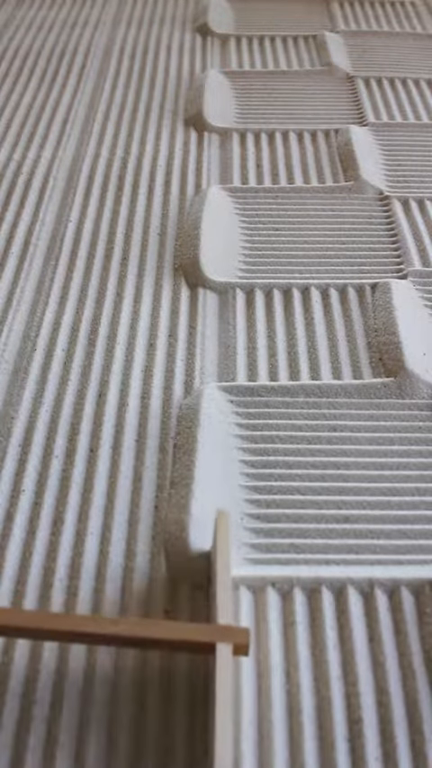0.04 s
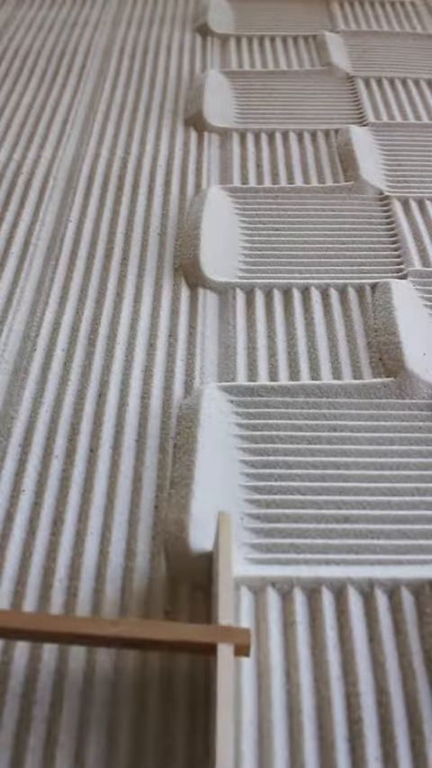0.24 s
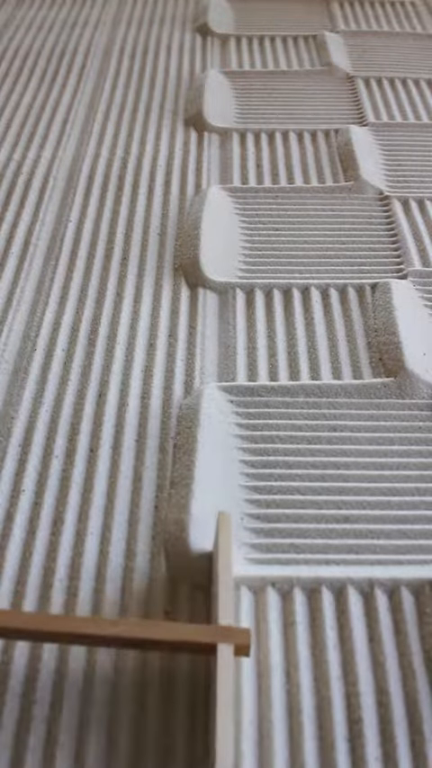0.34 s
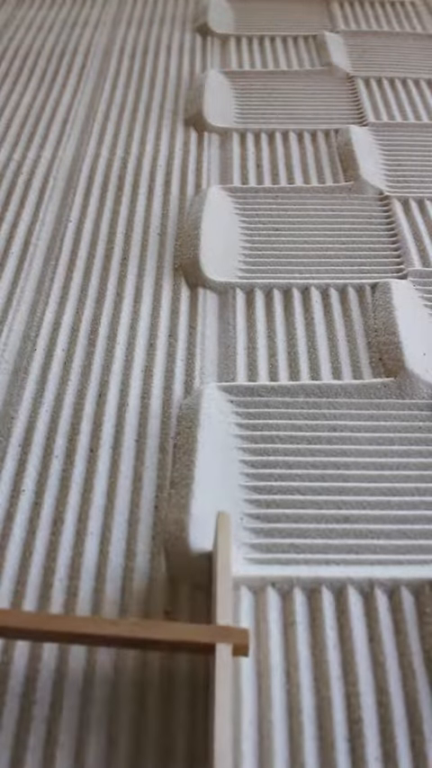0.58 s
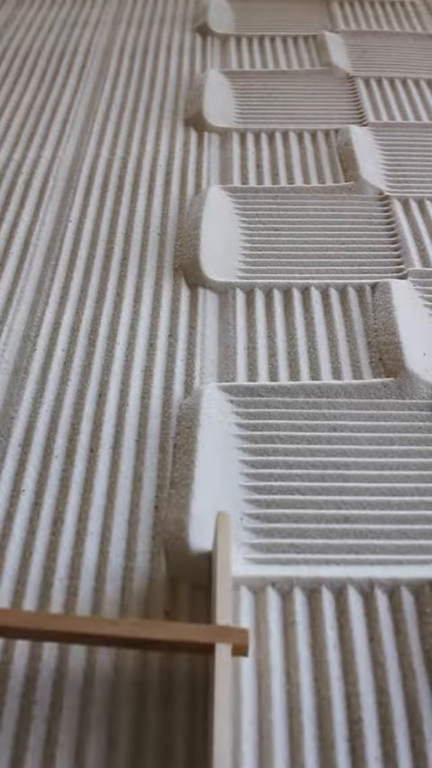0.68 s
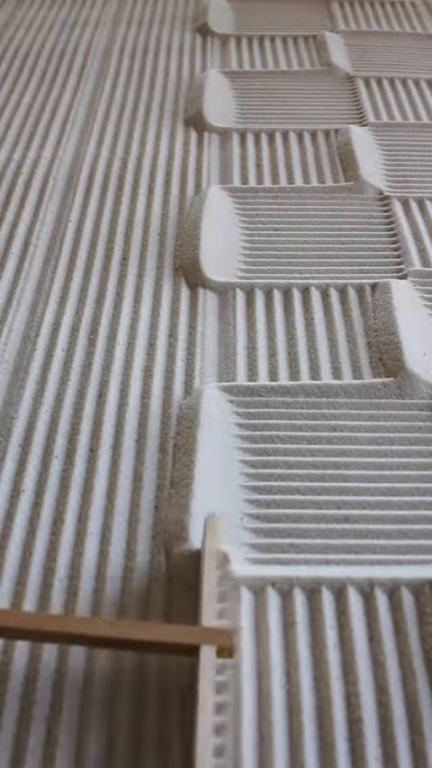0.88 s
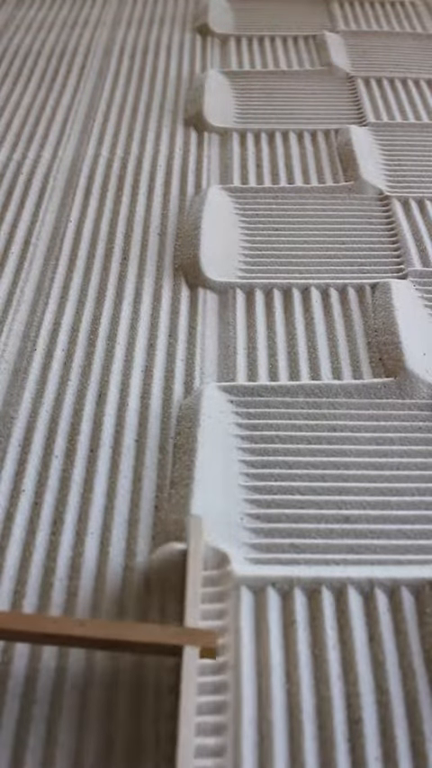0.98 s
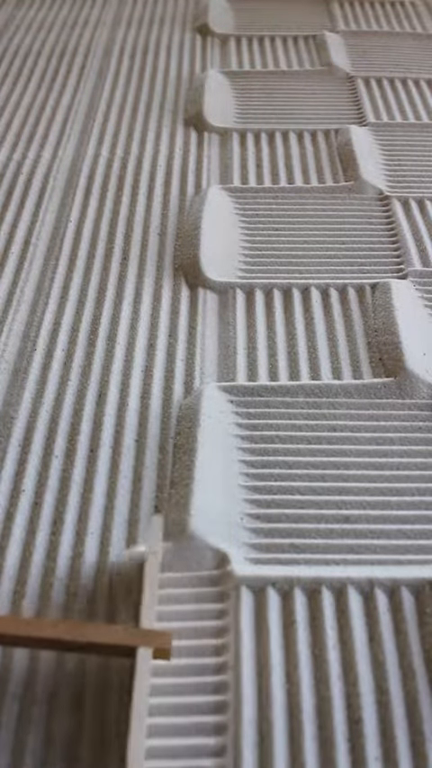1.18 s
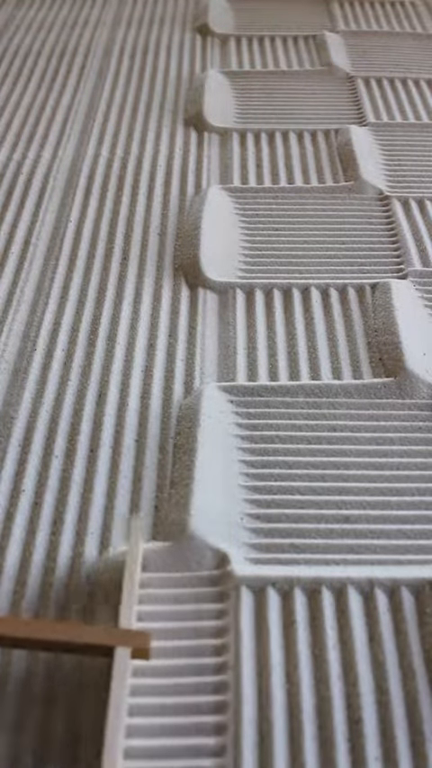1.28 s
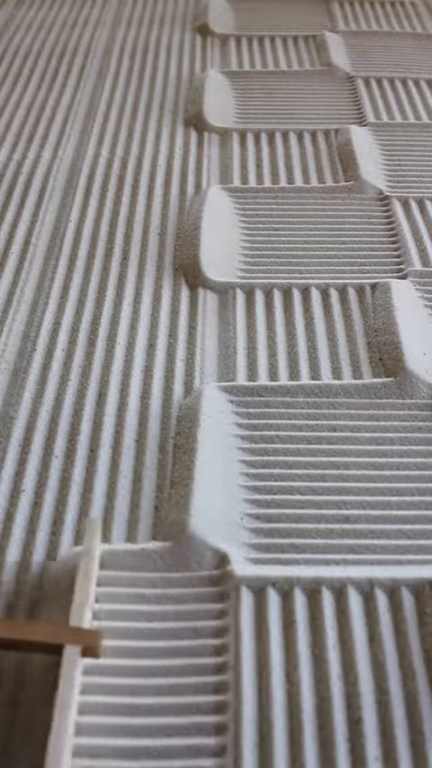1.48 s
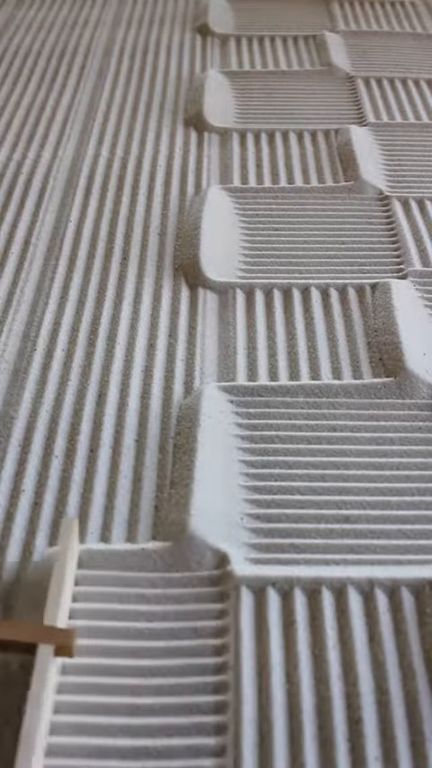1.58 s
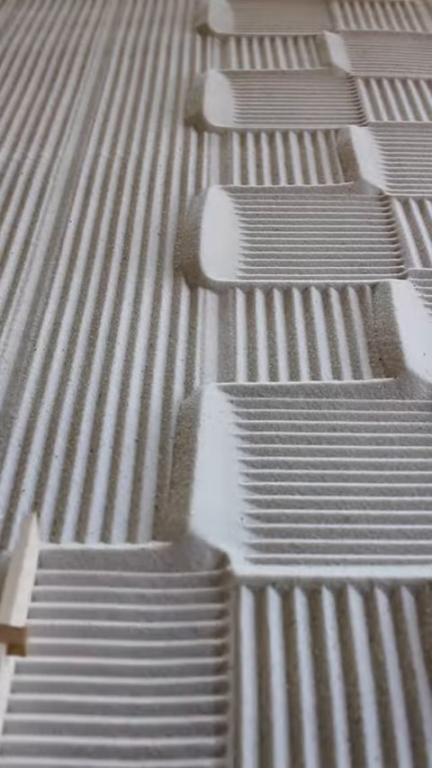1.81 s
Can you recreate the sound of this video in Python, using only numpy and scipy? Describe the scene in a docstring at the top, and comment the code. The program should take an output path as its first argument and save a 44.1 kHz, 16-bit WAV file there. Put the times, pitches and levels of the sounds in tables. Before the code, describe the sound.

A wooden rake scrapes through fine sand with a grainy hiss and small crunches.

```python
"""A wooden rake is drawn sideways through fine sand, close to the microphone, in a quiet room.
Ventilation hums throughout. First a light brush of sand, and a gust buffets the microphone.
After a pause, crisp ticks as the teeth touch down (0.7 s). Then one long grainy pull over swaying air:
short crunches, fine sand spills, the sound widens, and the rake's board drones, then briefly sings."""
import sys
import numpy as np
from scipy import signal
from scipy.fft import rfft, irfft
from scipy.io import wavfile
from scipy.ndimage import uniform_filter1d

SR = 44100
rng = np.random.default_rng(int(sys.argv[2]) if len(sys.argv) > 2 else 0)


def master(y):
    """Save y as 16-bit WAV."""
    cut = np.clip(np.atleast_2d(y).T, -1, 1)
    pcm = np.round(cut * 32767)  # scale
    wavfile.write(sys.argv[1], SR, pcm.astype(np.int16))


N = 81585
T = np.arange(N) / SR
HZ = np.fft.rfftfreq(N, 1 / SR)

# sand grains against the teeth: f/Hz, relative level/dB
SAND_SPECTRUM = [(300, -15), (900, -23), (1800, -11), (2800, -1.5), (4200, -0.5), (6500, -1), (8200, 0.4),
                 (9800, -5), (11000, -2.5), (13000, -7)]


def amp(db):
    """Decibels to gain."""
    return 10 ** (np.asarray(db) / 20)


def unit(x):
    """Scales to rms 1."""
    return x / np.sqrt(np.mean(x ** 2) + 1e-20)


def over_hz(points):
    """Interpolates a table over log frequency."""
    hz, value = np.transpose(points)
    return np.interp(np.log(HZ + 1), np.log(hz + 1), value)


def envelope(points):
    """Gain from a dB curve, falling 400 dB/s beyond its ends."""
    t_s, db = np.transpose(points)
    outside_s = np.maximum(t_s[0] - T, 0) + np.maximum(T - t_s[-1], 0)
    return amp(np.interp(T, t_s, db) - 400 * outside_s)


def colour(x, spectrum):
    """Filters by a spectrum table, keeping the power of white noise."""
    return irfft(rfft(x) * unit(amp(over_hz(spectrum))), N)


def drift(rate_hz):
    """Slow random motion of rms 1."""
    lowpass = np.exp(-(HZ / rate_hz) ** 2) * (HZ > 0)
    return unit(irfft(rfft(rng.standard_normal(N)) * lowpass, N))


def stereo(pair, correlation):
    """Two unrelated signals to left and right of a given correlation."""
    mid = rfft(pair[0]) * np.sqrt((1 + correlation) / 2)
    side = rfft(pair[1]) * np.sqrt((1 - correlation) / 2)
    return irfft(np.array([mid + side, mid - side]), N)


def pan(db):
    """Gains for a left-minus-right level."""
    return amp([[db / 2], [-db / 2]])


def ventilation():
    """A steady dull rush with wavering fan tones; the two near 290 Hz beat."""
    rush_spectrum = [(55, -5.5), (90, 7), (160, 3.5), (210, -4.5), (300, -2), (420, -4), (540, -10),
                     (720, -11.5), (900, -16), (1200, -16.5), (1375, -10.5), (1500, -16), (1900, -14),
                     (2500, -19), (4500, -32.5), (13000, -37.5)]  # f/Hz, relative level/dB
    rush_correlation = [(30, 1), (130, 0.2), (300, 0.52), (600, 0.43), (1400, 0.7), (3000, 0.7), (9000, 0)]  # f/Hz, left-right correlation
    fan_tones = [(82, -57.5), (240, -62), (281.8, -54), (297.4, -64.5), (395.5, -64.5), (481, -66.5),
                 (717, -75.5)]  # f/Hz, level/dB
    rush = colour(stereo(rng.standard_normal((2, N)), over_hz(rush_correlation)), rush_spectrum)
    hum = np.zeros(N)
    for hz, db in fan_tones:
        wander_hz = 1.81 * drift(rate_hz=6)
        turns = np.cumsum(hz + wander_hz) / SR + rng.random()
        flutter_db = drift(rate_hz=17.4)
        hum += np.sqrt(2) * amp(db + flutter_db) * np.sin(2 * np.pi * turns)
    return (amp(-48) * rush + hum) * pan(db=-1.55)


def turbulence(spectrum):
    """Rolling flow with its lulls evened out, unrelated on the two sides."""
    flow = colour(rng.standard_normal((2, N)), spectrum)
    power = abs(signal.hilbert(flow)) ** 2
    smooth_power = uniform_filter1d(uniform_filter1d(power, size=4096), size=4096)
    return stereo(unit(flow / np.sqrt(smooth_power)), correlation=0)


def air():
    """A gust, then a slower sway of air, buffets the microphone."""
    gust_spectrum = [(10, 7), (28, 5.5), (48, -1.5), (70, -9.5), (105, -33), (300, -87)]  # f/Hz, relative level/dB
    gust_curve = [(.14, -45.5), (.2, -35.5), (.28, -18), (.38, -25), (.49, -24.5), (.59, -34.5)]  # t/s, level/dB
    sway_spectrum = [(13, -1), (24, -11), (34, -23.5), (50, -27.5), (150, -100)]  # f/Hz, relative level/dB
    sway_curve = [(.5, -39.5), (.8, -32.5), (.88, -34), (1, -29), (1.4, -32), (1.85, -47.5)]  # t/s, level/dB
    gust = turbulence(gust_spectrum) * envelope(gust_curve)
    sway = turbulence(sway_spectrum) * envelope(sway_curve)
    return (gust + sway) * pan(db=-1)


def at_rake(pair, wider_db=0):
    """Spreads two unrelated signals between left and right as the rake travels."""
    travel = [(.1, -20, -1), (.85, -21, -2), (1.03, -14.5, 0), (1.35, -2, 0), (1.85, -8.5, 1.3)]  # t/s, side minus mid/dB, left minus right/dB
    t_s, side_db, pan_db = np.transpose(travel)
    side = pair[1] * amp(np.minimum(np.interp(T, t_s, side_db) + wider_db, 0))
    lean = amp(np.interp(T, t_s, pan_db) / 2)
    return np.array([(pair[0] + side) * lean, (pair[0] - side) / lean])


def grains(per_s, spread_db):
    """Random collisions, most tiny, a few large."""
    sizes = amp(spread_db * np.minimum(rng.exponential(1, (2, N)), 5))
    signs = rng.choice([-1, 1], (2, N))
    hits = rng.random((2, N)) < per_s / SR
    return unit(sizes * signs * hits)


def grit(grain_share=0.52):
    """Dense grain collisions over the smooth hiss of finer sand."""
    collisions = grains(per_s=6500, spread_db=1.5)
    return np.sqrt(grain_share) * collisions + np.sqrt(1 - grain_share) * rng.standard_normal((2, N))


def slipping(rate_hz, depth_db):
    """Sand packs and yields unevenly, so its level flutters."""
    return amp(depth_db * drift(rate_hz))


def patchy(x, depth_db):
    """Narrow parts of the spectrum come and go."""
    frames = signal.stft(x, nperseg=512, noverlap=384)[2]
    patches = uniform_filter1d(rng.standard_normal(frames.shape[1:]), size=4, axis=0)
    patches = unit(uniform_filter1d(patches, size=24, axis=1))
    return signal.istft(frames * amp(depth_db * patches), nperseg=512, noverlap=384)[1][:, :N]


def trickle():
    """Loose grains crackle in small clumps as the teeth settle in."""
    trickle_curve = [(.67, -63), (.73, -73), (.79, -60)]  # t/s, level/dB
    crackle = colour(grains(per_s=1400, spread_db=2), SAND_SPECTRUM)
    return at_rake(crackle * envelope(trickle_curve) * slipping(rate_hz=24, depth_db=12))


def board_rings():
    """Resonances of the wooden board swell and fade as it ploughs."""
    # start/s, length/s, f/Hz, width/Hz, level/dB, left-right correlation
    resonances = [(0.917, 0.41, 180, 133, -50, -0.85), (1.446, 0.38, 730, 50.6, -62.5, 0.69)]
    rings = np.zeros((2, N))
    for start_s, length_s, hz, width_hz, db, correlation in resonances:
        band = (1 + ((HZ - hz) / width_hz) ** 2) ** -4
        ring = unit(irfft(rfft(rng.standard_normal((2, N))) * band, N))
        swell = np.sin(np.pi * np.clip((T - start_s) / length_s, 0, 1))
        rings += amp(db) * stereo(ring, correlation) * swell
    return rings


def crunches(fall_to_rise=0.44):
    """Rustles, ticks and crunches: short bursts of noise that swell and stop quickly."""
    events = [(0.2897, -51.5, .0012), (0.425, -63, 0.016), (.469, -67.5, .007), (0.52, -60, .005),
              (.622, -64.5, 0.0092), (.670, -52.5, 0.0013), (0.706, -38.5, 0.0016), (0.7109, -45, 0.0013),
              (.7186, -49, 0.0014), (0.7282, -42.5, 0.0024), (0.746, -32.5, 0.00024),
              (0.7566, -54, 0.00093), (0.7788, -40.5, 0.0028), (0.813, -43.5, 0.0081),
              (0.8764, -47, 0.0024), (0.8963, -35.5, 0.0026), (.920, -43, .0035), (0.9982, -37, 0.0016),
              (1.011, -39.5, 0.0035), (1.023, -42, .003), (1.0504, -45, 0.0037), (1.069, -44.5, 0.0045),
              (1.1515, -47, .001), (1.1771, -31.5, 0.00037)]  # peak t/s, level/dB, rise/s
    crunch_spectrum = [(200, -11), (900, 3.5), (3200, 0), (4200, -3), (6500, 2), (9500, -6.5), (11500, 1.5),
                       (13000, -4)]  # f/Hz, relative level/dB
    bursts = np.zeros(N)
    for peak_s, db, rise_s in events:
        from_peak_s = np.maximum(peak_s - T, (T - peak_s) / fall_to_rise)
        bursts += amp(db) * np.exp(-from_peak_s / rise_s)
    return at_rake(colour(bursts * rng.standard_normal((2, N)), crunch_spectrum))


def spill(start_s=0.76, rise_s=0.039):
    """Fine sand runs off the ridges once the rake moves."""
    spill_spectrum = [(4500, -5.5), (6500, -1.5), (7800, 1.5), (9000, 0.5), (10200, -1.5), (13000, -6)]  # f/Hz, relative level/dB
    onset = np.clip((T - start_s) / rise_s, 0, 1)
    return at_rake(colour(grit(), spill_spectrum) * amp(-56) * onset)


def board_rub():
    """Sand shoved ahead of the board gives a duller, wider rub."""
    rub_spectrum = [(150, 3), (540, -1.5), (720, -8), (950, -7.5), (1120, -19.5), (1800, -7.5), (2400, -24),
                    (3400, -21), (7000, -37)]  # f/Hz, relative level/dB
    shove_curve = [(.68, -66), (.8, -51.5), (.89, -50.5), (.94, -53), (1.01, -48.5), (1.11, -52.5),
                   (1.17, -53), (1.27, -59.5), (1.6, -61.5), (1.85, -55)]  # t/s, level/dB
    return at_rake(colour(grit(), rub_spectrum) * envelope(shove_curve), wider_db=13.5)


def teeth_hiss():
    """Grains stream past the teeth: a light brush, then the long pull."""
    brush_curve = [(0, -61), (.05, -56.5), (.08, -59.5), (.097, -66.5), (.113, -54), (.148, -58),
                   (.182, -46.5), (.216, -54.5), (.24, -69), (.255, -59.5), (.31, -83)]  # t/s, level/dB
    pull_curve = [(.69, -67.5), (.765, -64), (.805, -50.5), (.86, -51), (.895, -49.5), (.945, -52.5),
                  (1.008, -48.5), (1.1, -53.5), (1.2, -55.5), (1.28, -67), (1.4, -60.5), (1.53, -55),
                  (1.72, -53), (1.85, -57)]  # t/s, level/dB
    return at_rake(colour(grit(), SAND_SPECTRUM) * (envelope(brush_curve) + envelope(pull_curve)))


def rake():
    """Hiss, spill and rub flutter together as the sand slips."""
    sand = teeth_hiss() + spill() + board_rub()
    return patchy(sand, depth_db=2.06) * slipping(rate_hz=77, depth_db=1.16)


def scene():
    """Room and air behind, rake and sand in front."""
    return ventilation() + air() + trickle() + board_rings() + crunches() + rake()


def record(dry):
    """Low-pass band limit."""
    cutoff_hz = 13120
    lowpass = signal.firwin(1023, cutoff_hz, window=("kaiser", 8), fs=SR)
    return signal.oaconvolve(dry, lowpass[None], "same")


dry = scene()
out = record(dry)
master(out)
```